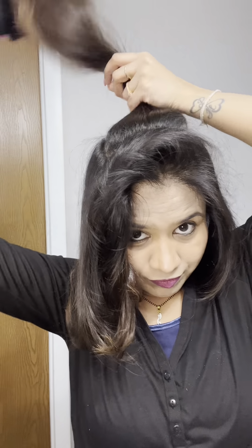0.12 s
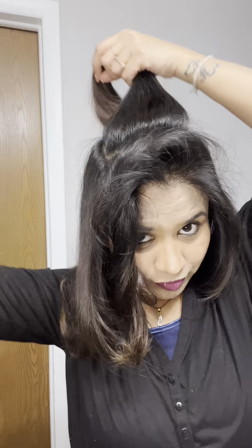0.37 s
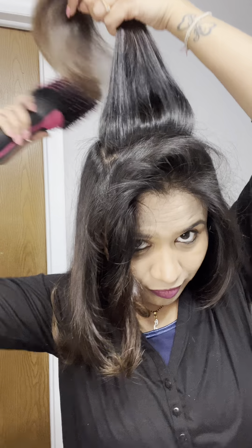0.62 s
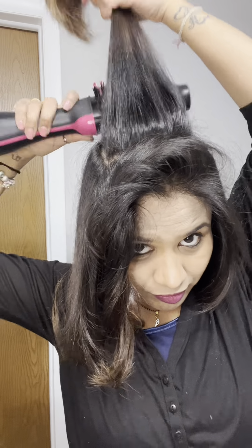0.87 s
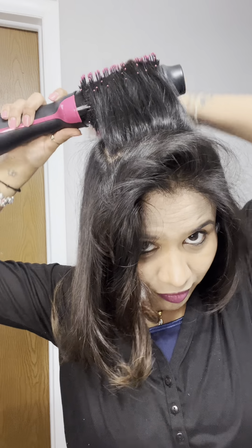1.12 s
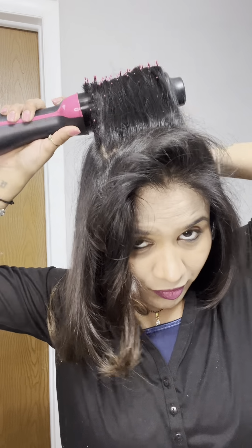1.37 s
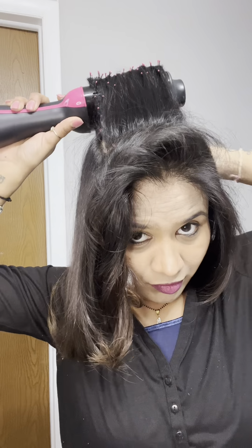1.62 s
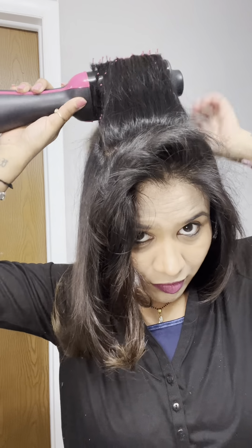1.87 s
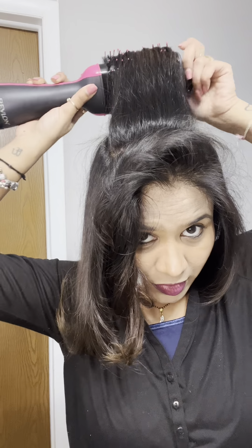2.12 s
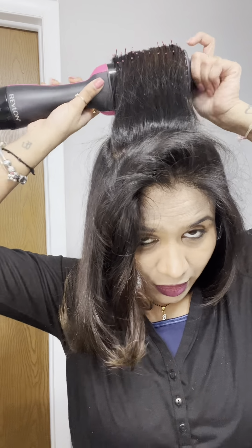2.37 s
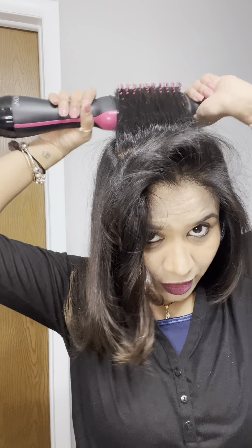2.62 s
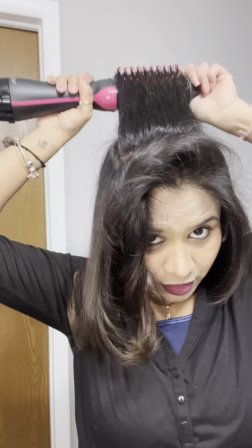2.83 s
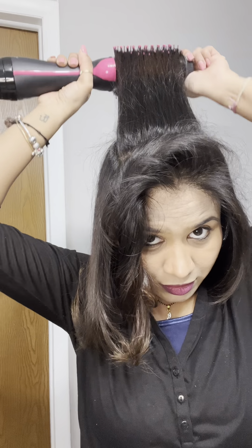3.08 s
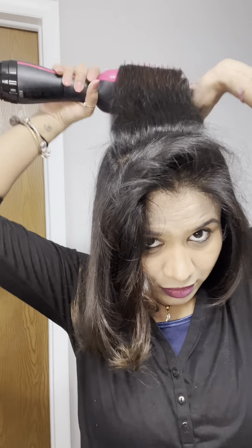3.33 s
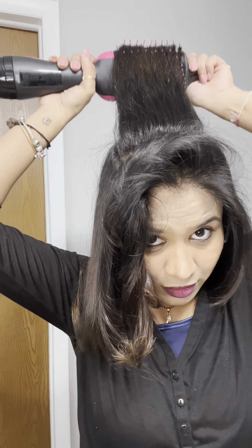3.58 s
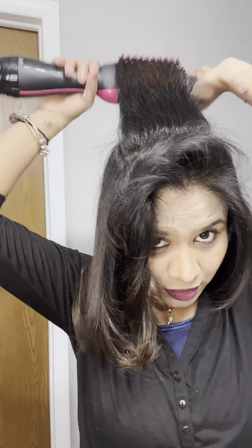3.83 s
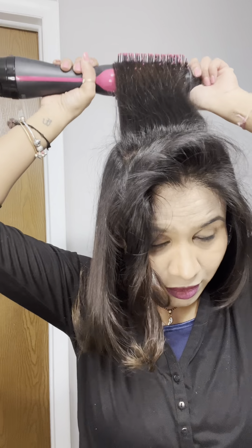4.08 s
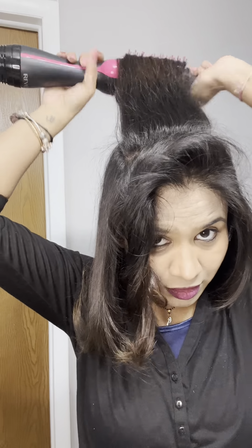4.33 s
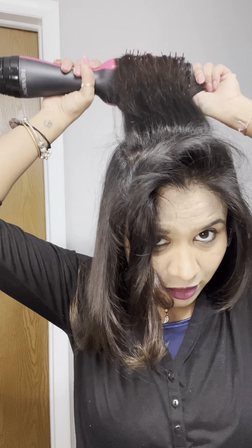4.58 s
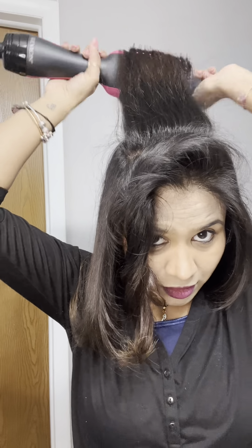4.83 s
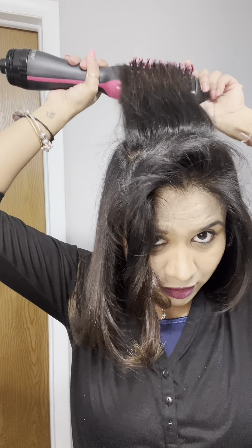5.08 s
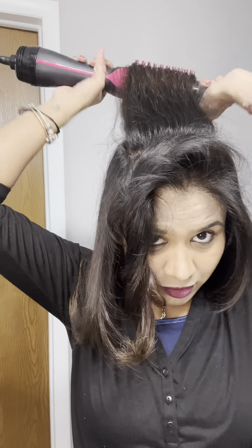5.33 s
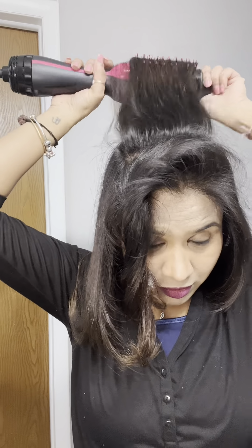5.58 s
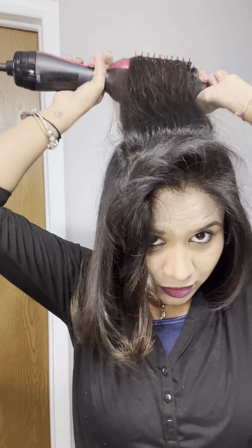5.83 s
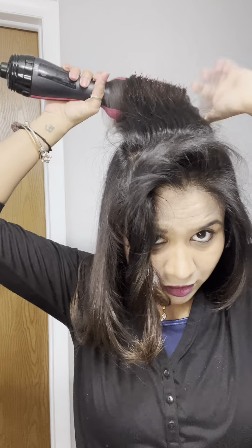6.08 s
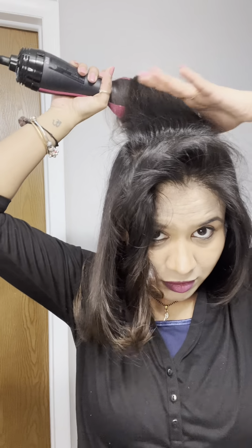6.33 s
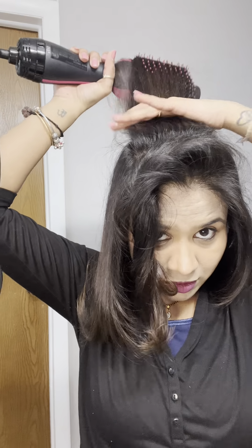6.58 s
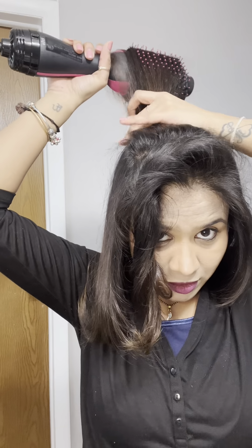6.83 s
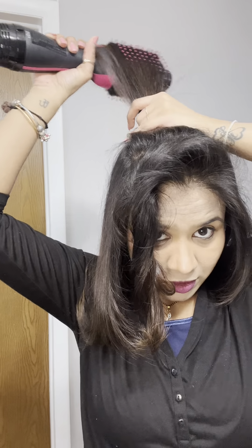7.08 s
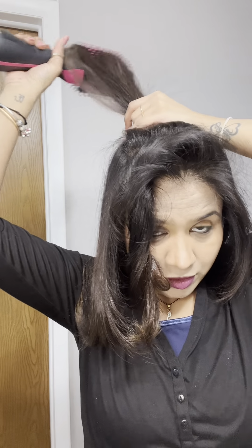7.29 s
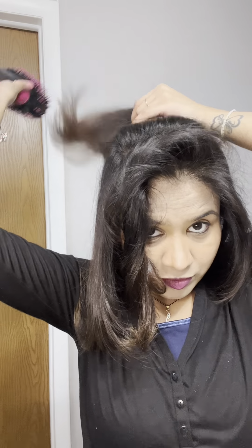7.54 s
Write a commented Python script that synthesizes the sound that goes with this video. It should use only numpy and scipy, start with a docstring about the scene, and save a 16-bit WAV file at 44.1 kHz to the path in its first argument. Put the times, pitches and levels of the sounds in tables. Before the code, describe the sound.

A hot-air styling brush runs steadily close by in a small room, rushing air with a thin, high, wavering motor whine on top.

```python
"""In a small room, a hot-air styling brush runs while it is drawn slowly through hair.
Shaped noise makes the rush, roar and hiss of air; narrow noise makes breathy pipe tones in the barrel.
Sines on multiples of the shaft speed make the motor tones and the whine of a seven-blade fan.
Swaying wall echoes ripple the air noise, and the tones fade in and out as the brush moves.
Mains hum, a low rumble in the air noise and a few soft ringing thuds lie below."""
import sys
import numpy as np
from scipy import signal
from scipy.fft import rfft, irfft
from scipy.io import wavfile
from scipy.ndimage import map_coordinates

SR = 44100
rng = np.random.default_rng(int(sys.argv[2]) if len(sys.argv) > 2 else 0)


def bounce(signal):
    """Save signal as a 16-bit WAV file at the path given by the first command-line argument."""
    frames = np.transpose(np.atleast_2d(signal))
    limited = np.clip(frames, -1, 1)
    pcm = np.round(limited * 32767).astype(np.int16)
    wavfile.write(sys.argv[1], SR, pcm)


def amplitude_ratio(level_db):
    """Convert a level in decibels to the matching linear amplitude (field) ratio."""
    exponent = np.asarray(level_db, float) / 20
    return 10 ** exponent


N = 338688

# spectrum of the air noise before resonances and flow: (frequency [Hz], level [dB per Hz])
AIR_COLOUR = [(25, -90), (60, -78), (200, -90), (400, -81.5), (520, -68.5), (900, -66), (1600, -70),
              (2500, -60), (3100, -65.5), (3700, -73), (4850, -74.5), (6500, -68), (7700, -74), (9500, -76),
              (11000, -74.5), (12500, -82), (15650, -87.5), (15800, -110)]
# resonances of barrel and room: (frequency [Hz], width [Hz], lift [dB])
RESONANCES = [(50.4, 4, 11.5), (75, 12, -7), (241.5, 39, 12.5), (331, 55, 7), (656, 37, 4), (495, 24, -8),
              (734, 11.4, -9), (873, 23, -16.5), (910, 11, 6.5), (1110, 66, -2.5), (1210, 40, -6),
              (1324, 19, 7), (1429, 42, 5.5), (1673, 28, 3.5), (1845, 97, 5.5), (1958, 58, 1.5),
              (2250, 42, 2.5), (2660, 80, -4), (2920, 69, 3), (3450, 68, 5), (4120, 540, 6), (9150, 270, 9)]
# hiss from the holes that the hair leaves uncovered: (time [s], level [dB])
HOLE_HISS = [(0.0, 0), (0.5, 5), (0.77, 1.5), (1.3, 1), (1.6, 0.5), (3.0, 0.4), (5.0, 0.5), (6.1, 1.2),
             (6.9, 3), (7.17, 1.5), (7.42, 3), (7.68, 5.5)]
# borders between rush, roar, lower hiss and upper hiss: (frequency [Hz], ...)
ZONE_EDGES_HZ = (1650, 3600, 7000)
RUSH_DB, ROAR_DB, FLOW_WANDER_DB = 0.12, -1, 0.5
ROAR_SHARE, LOWER_HISS_SHARE = 0.58, 0.51   # how far each follows the uncovered holes
# left-right likeness of the air noise in the bass: (frequency [Hz], likeness [0-1])
BASS_LIKENESS = [(60, .9995), (100, .998), (210, .98)]
# the same in the treble, whole where it stands in or out of phase: (frequency [Hz], likeness [0-1])
TREBLE_LIKENESS = [(3700, .55), (3950, .86), (4600, .8), (4900, .65), (6700, .82), (7500, .68), (7700, .86),
                   (8200, .9), (8350, .9995), (8900, 1), (9550, 1), (9700, .96), (10250, .93), (10400, .74),
                   (12300, .5), (12450, 1)]
# the same over the whole range: (frequency [Hz], likeness [0-1])
LIKENESS = BASS_LIKENESS + [(330, 1.0), (600, 0.94), (850, 0.59), (1200, 0.7),
            (2700, 0.6)] + TREBLE_LIKENESS
# balance of the air noise: (frequency [Hz], left minus right [dB])
LEAN = [(80, 0), (200, -1.5), (400, -3), (700, 1), (1290, 1), (2400, 0)]
# wall echoes of the air noise: (mean delay [s], level [dB])
ECHOES = [(.0047, -8), (.0071, -8), (.0113, -9), (.0164, -10), (.023, -12)]
ECHO_SWAY_S, SWAY_HZ, ECHO_FROM_HZ = 0.00025, 0.35, 1200

# swells of the breathy pipe tones: (centre time [s], frequency [Hz], length at half height [s], level [dB])
WHISTLES = [(.15, 2470, .4, -38), (.3, 2670, .4, -35), (1.03, 2500, .2, -31), (1.05, 2820, .3, -43),
            (1.3, 2366, 1.0, -35), (1.303, 2474, .25, -31), (1.802, 2560, .4, -35),
            (2.2, 2740, 0.54, -34.5), (2.6, 2800, 0.63, -36), (3.4, 2464, .4, -33.5), (3.5, 2690, .5, -38),
            (3.8, 2500, 0.38, -46), (4.423, 2500, .3, -29.5), (5.0, 2697, .6, -37), (5.14, 2537, 0.26, -32),
            (5.6, 2685, 0.53, -33.5), (5.6, 2550, 0.44, -43), (7.5, 2264, 0.54, -37), (6.05, 2535, .3, -31),
            (6.45, 2470, .3, -36.5), (6.5, 2650, .4, -43), (7.4, 2450, 0.63, -36)]
# the two pipe tones that sound throughout: (frequency [Hz], level [dB])
PIPES = [(2510, -46.5), (2690, -43)]
# lowest pipe tone, sounding while hair wraps the barrel
DRONE_HZ, DRONE_RISE_HZ_PER_S, DRONE_DB = 641, 1.8, -46.5
HAIR_ON_S, HAIR_OFF_S = 0.8, 7.5

# motor speed before its fine wander: (time [s], shaft speed [turns per s])
SPEED = [(0.0, 472.3), (0.27, 472.7), (0.5, 471.4), (1.0, 471.9), (1.65, 472.6), (1.85, 473.8),
         (2.3, 473.8), (2.56, 472.8), (2.74, 473.8), (3.29, 472.5), (3.84, 471.8), (4.85, 472.5),
         (5.03, 473.3), (5.49, 473.8), (5.94, 471.8), (6.22, 471.8), (6.77, 472.7), (7.04, 471.4),
         (7.31, 470.7), (7.68, 470.7)]
# motor tones before swells and flutter: (shaft multiple, level [dB])
MOTOR = [(1, -53.5), (2, -58), (5, -50.5), (14, -53.5), (21, -57)]
# a motor tone swells while the echoes add up: (centre time [s], shaft multiple, length [s], lift [dB])
TONE_SWELLS = [(0.1, 2, 0.63, 16.5), (0.0, 5, 0.36, 7), (0.282, 14, .25, 20), (0.0, 1, 0.26, 7),
               (0.6, 1, 0.51, 6.5), (1.1, 5, 0.55, 14), (1.45, 5, 0.24, 6), (1.77, 5, 0.13, 16),
               (1.4, 21, 1.8, 13.5), (1.7, 14, .4, 14.5), (2.15, 2, 0.74, 11.5), (2.2, 5, .3, 10),
               (2.74, 21, 0.78, 10), (3.098, 5, 1.3, 9), (3.1, 1, 1.2, 5.5), (3.7, 2, 0.48, 7),
               (4.1, 21, 0.2, 8), (4.4, 2, .6, 14), (5.2, 5, .3, 0), (5.3, 1, 1.5, 5.5), (6.45, 2, 0.5, 12),
               (6.6, 5, 0.83, 14.5), (6.803, 14, .4, 17.5), (7.0, 1, .4, 5.5), (7.55, 5, .5, 12),
               (7.5, 21, 0.27, 9)]
# further motor tones without swells: (shaft multiple, level [dB])
STEADIER_TONES = [(3, -50), (4, -53), (6, -68), (9, -69), (10, -63)]
# blade-passing whine before the brief changes below: (time [s], left level [dB], right level [dB])
WHINE = [(0.0, -25, -25), (0.27, -24, -26), (0.5, -29.5, -26.5), (0.67, -30.5, -35), (0.79, -32, -22.5),
         (1.08, -27, -21), (1.33, -33, -25), (1.68, -30, -26.5), (1.8, -29.5, -56), (2.15, -26.5, -42),
         (2.49, -23.5, -62), (2.57, -31, -34), (2.8, -29, -38), (2.95, -34, -54), (3.32, -32.5, -27),
         (3.65, -28, -29), (3.85, -25.5, -25), (4.02, -28.5, -30), (4.17, -31, -27), (4.54, -32, -31.5),
         (4.75, -52, -53), (4.99, -35, -45), (5.44, -28, -37), (5.6, -34.5, -38), (5.77, -29, -28.5),
         (6.28, -23.5, -25.5), (6.9, -28.5, -26.5), (7.18, -37, -36), (7.35, -28.5, -53),
         (7.61, -26.5, -24), (7.68, -36, -43)]
# brief changes of the whine, mostly dips, as a side passes a quiet spot between echoes:
# (centre time [s], length [s], left change [dB], right change [dB])
WHINE_DIPS = [(0.0, 0.075, -17, -17), (0.115, .05, -18, -12), (0.204, .06, 2.5, -5), (0.337, .06, -19, -18),
              (0.427, .07, -3, -8), (0.725, 0.045, -7, -10), (0.85, 0.066, 0, -17), (0.918, .06, -13, -3),
              (1.017, .05, -2, -2.5), (2.61, .06, -8, 6), (2.655, 0.067, -2, -14), (3.21, .08, -3, -8),
              (3.45, 0.22, -0.5, -15), (3.58, .1, -3, 1), (3.73, 0.077, -13, -17), (3.935, 0.06, -12, -9),
              (4.35, 0.11, -2, -4), (4.63, 0.065, -10, -10), (4.9, .1, -12, 3), (5.04, 0.054, -15, -14),
              (5.153, 0.091, -6, -15), (5.344, 0.11, -16, -7), (5.505, 0.061, -22, -16),
              (5.683, 0.067, -8, -5), (5.897, 0.091, -6, -6), (7.457, .07, -10, 10), (7.523, 0.054, -4, -5)]
BLADES = 7
WHINE_LEAD_RAD = 0.34   # left ahead of right, before the right side is turned in phase

# mains hum before wavering and sinking: (frequency [Hz], level [dB])
HUM = [(120, -61), (239, -63.5)]
HUM_SINK_DB_PER_S = -0.54

# far thuds through the floor: (time [s], strength of the blow [dB])
THUDS = [(.5, -47), (2.84, -46), (3.533, -37), (4.625, -39)]
# low modes of the floor: (frequency [Hz], level [dB], time to fall by 60 dB [s])
THUD_MODES = [(74.5, -1.5, .3), (100, -8, .15), (149.6, -8, 0.11), (224, -8, 0.13), (345, -9, .12)]

# phase turn of the right side in the bass: (frequency [Hz], turn back [rad])
BASS_LEAD = [(0, 0), (100, .03)]
# the same in the treble, opposed at 8-10 kHz, in step above 12.4 kHz: (frequency [Hz], turn back [rad])
TREBLE_LEAD = [(7500, 2.4), (8250, np.pi), (9700, np.pi), (10250, 3.3), (10400, 3.9), (12350, 5.35),
               (12450, 2 * np.pi), (23000, 2 * np.pi)]
# the same over the whole range: (frequency [Hz], turn back [rad])
RIGHT_TURN = BASS_LEAD + [(500, 0.44), (780, -0.094), (900, -0.98), (1150, -0.54), (1460, 0.33),
              (1720, -0.59), (2070, 0.25), (4500, 0.26)] + TREBLE_LEAD


def in_time(rows):
    """Columns of a table, joined by straight lines, one value a sample."""
    s, *columns = np.transpose(rows)
    return [np.interp(np.arange(N) / SR, s, column) for column in columns]


def at_hz(points, hz):
    """A spectrum read on a log-frequency axis."""
    point_hz, value = np.transpose(points)
    return np.interp(np.log(hz + 1), np.log(point_hz), value)


def drift(corner_hz):
    """Slow random wander of spread 1: noise at every 50th sample through a double one-pole."""
    r = np.exp(-2 * np.pi * corner_hz * 50 / SR)
    noise = rng.standard_normal(N // 50 + 3002)
    slow = signal.lfilter([1], [1, -2 * r, r * r], noise)[3000:]   # skip the filter's start
    slow -= slow.mean()
    return np.interp(np.arange(N) / 50, np.arange(len(slow)), slow / slow.std())


def bump(s, length_s):
    """A smooth hump of height 1, half as high at half its length from the centre."""
    first = max(round((s - 2 * length_s) * SR), 0)
    last = min(round((s + 2 * length_s) * SR), N)
    near = np.arange(first, last)
    out = np.zeros(N)
    out[near] = 0.5 ** ((2 * (near / SR - s) / length_s) ** 2)
    return out


def tone(turns, fade_db, spread_rad, wander_hz):
    """A sine on both sides, rms 1 before its level and left-right phase wander as echoes make them do."""
    phase = 2 * np.pi * (turns + rng.random())
    lead = spread_rad * drift(0.89)
    return np.sqrt(2) * amplitude_ratio(fade_db * drift(wander_hz)) * np.sin([phase + lead, phase - lead])


def echoed(x):
    """Echoes whose delays sway as the brush moves comb the upper noise with wandering ripples."""
    out = x.copy()
    upper = signal.sosfilt(signal.butter(2, ECHO_FROM_HZ, "high", fs=SR, output="sos"), x)
    for delay_s, db in ECHOES:
        read = np.arange(N) - SR * (delay_s + ECHO_SWAY_S * drift(SWAY_HZ))
        out += amplitude_ratio(db) * map_coordinates(upper, [read], order=1, mode="wrap")
    return out


def air(flicker_db=0.5):
    """Turbulent noise coloured by the barrel; four zones follow the flow, each with a light flicker."""
    hz = np.fft.rfftfreq(N, 1 / SR)
    colour_db = at_hz(AIR_COLOUR, hz)
    for centre_hz, width_hz, lift_db in RESONANCES:
        colour_db += lift_db / (1 + (2 * (hz - centre_hz) / width_hz) ** 2)

    # one noise common to both sides, one with opposite signs
    shared = rfft(echoed(rng.standard_normal(N)))
    apart = rfft(echoed(rng.standard_normal(N)))
    alike = np.clip(at_hz(LIKENESS, hz), 0, 1)
    pair = np.sqrt((1 + alike) / 2) * shared + np.sqrt((1 - alike) / 2) * apart * [[1], [-1]]
    side_db = at_hz(LEAN, hz) * [[0.5], [-0.5]]
    pair *= amplitude_ratio(colour_db + side_db) * np.sqrt(SR / 2)

    hiss_db, = in_time(HOLE_HISS)
    zones_db = (RUSH_DB, ROAR_DB + ROAR_SHARE * hiss_db, LOWER_HISS_SHARE * hiss_db, hiss_db)
    # soft high-pass at each border; a zone is what lies between two of them
    above = [1] + [1 / (1 + (edge / (hz + 1)) ** 8) for edge in ZONE_EDGES_HZ] + [0]
    out = 0
    for k, db in enumerate(zones_db):
        level_db = db + flicker_db * drift(4.6) + FLOW_WANDER_DB * drift(2.05)
        out = out + amplitude_ratio(level_db) * irfft(pair * (above[k] - above[k + 1]), N)
    return out


def whistles(width_hz=36, apart=0.35, waver=0.0015, gust_db=1.2):
    """Breathy pipe tones of the barrel: narrow noise riding on centres set by the hair over the holes."""
    t = np.arange(N) / SR
    low_pass = signal.butter(2, width_hz / 2, fs=SR, output="sos")
    a, b, c, d = signal.sosfilt(low_pass, rng.standard_normal((4, N)))
    breath = (a + 1j * b) + apart * (c + 1j * d) * [[1], [-1]]
    breath = amplitude_ratio(gust_db * drift(3.0)) * breath
    breath /= breath.real.std()

    clock = np.cumsum(1 + waver * drift(2.47)) / SR   # all pitches waver together
    wrap_on = np.clip((t - HAIR_ON_S) / 0.3 + 0.5, 0.15, 1)
    wrap_off = np.clip((HAIR_OFF_S - t) / 0.34 + 1, 0, 1)
    drone_turns = DRONE_HZ * clock + DRONE_RISE_HZ_PER_S * t ** 2 / 2
    voices = [(hz * clock, amplitude_ratio(db) * bump(s, length_s)) for s, hz, length_s, db in WHISTLES]
    voices += [(hz * clock, np.full(N, amplitude_ratio(db))) for hz, db in PIPES]
    voices += [(drone_turns, amplitude_ratio(DRONE_DB) * wrap_on * wrap_off)]

    out = np.zeros((2, N))
    for k, (turns, gain) in enumerate(voices):
        on = np.flatnonzero(gain)
        own_breath = breath[:, on - k * N // len(voices)]   # each voice reads the noise from another place
        out[:, on] += gain[on] * np.real(own_breath * np.exp(2j * np.pi * turns[on]))
    return out


def shaft_turns():
    """Running count of shaft turns, the speed wandering finely around its course."""
    speed, = in_time(SPEED)
    return np.cumsum(speed + 0.1 * drift(6)) / SR


def motor_tones(turns):
    """The shaft and its multiples; among those that swell, the higher flutter faster and deeper."""
    out = 0
    for k, db in MOTOR:
        swell_db = sum(lift_db * bump(s, length_s)
                       for s, multiple, length_s, lift_db in TONE_SWELLS if multiple == k)
        flutter = tone(k * turns, 0.7 + 1.07 * np.log(k), spread_rad=0.32, wander_hz=4.3 * np.sqrt(k))
        out = out + amplitude_ratio(db + swell_db) * flutter
    for k, db in STEADIER_TONES:
        out = out + amplitude_ratio(db) * tone(k * turns, fade_db=0.5, spread_rad=0.27, wander_hz=4.4)
    return out


def fan_whine(turns):
    """Blades passing at seven times the shaft speed sound one sine, its level shaped for each side."""
    whine_db = np.array(in_time(WHINE))
    for s, length_s, *sides_db in WHINE_DIPS:
        whine_db += np.outer(sides_db, bump(s, length_s))
    phase = 2 * np.pi * BLADES * turns
    return np.sqrt(2) * amplitude_ratio(whine_db) * np.sin([phase + WHINE_LEAD_RAD, phase])


def hum():
    """Mains tones that waver and slowly sink."""
    t = np.arange(N) / SR
    tones = sum(amplitude_ratio(db) * tone(hz * t, fade_db=2.8, spread_rad=0.03, wander_hz=3) for hz, db in HUM)
    return amplitude_ratio(HUM_SINK_DB_PER_S * t) * tones


def thuds():
    """Soft blows set the low modes of the floor ringing, neighbours in opposite directions."""
    push, out = np.zeros(N), 0
    for s, db in THUDS:
        push[round(s * SR)] = amplitude_ratio(db)
    push += 1e-18   # keeps the resonators clear of vanishingly small numbers
    for k, (hz, db, t60_s) in enumerate(THUD_MODES):
        r = amplitude_ratio(-60 / (t60_s * SR))
        w = 2 * np.pi * hz / SR
        gain = (-1) ** k * amplitude_ratio(db) * np.sin(w)
        out = out + signal.lfilter([0, gain], [1, -2 * r * np.cos(w), r * r], push)
    return signal.sosfilt(signal.butter(2, [62, 380], "band", fs=SR, output="sos"), out)


def scene():
    """Brush, hum and thuds together; motor tones and whine share one shaft."""
    turns = shaft_turns()
    return air() + whistles() + motor_tones(turns) + fan_whine(turns) + hum() + thuds()


def top_cut(x):
    """Nothing passes above the cut-off."""
    return signal.sosfilt(signal.butter(12, 15870, fs=SR, output="sos"), x)


def record(dry):
    """The microphone drops the deepest bass; the right side is turned in phase by a table over frequency."""
    dry = signal.sosfilt(signal.butter(4, 44, "high", fs=SR, output="sos"), dry)
    turn_rad = np.interp(np.fft.rfftfreq(N, 1 / SR), *np.transpose(RIGHT_TURN))
    right = irfft(rfft(dry[1]) * np.exp(-1j * turn_rad), N)
    return top_cut(np.array([dry[0], right]))


dry = scene()
out = record(dry)
bounce(out)
```